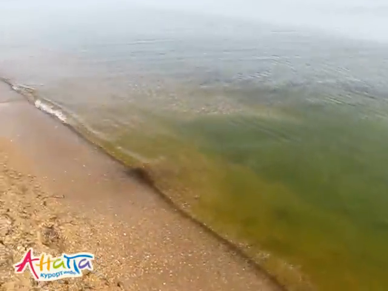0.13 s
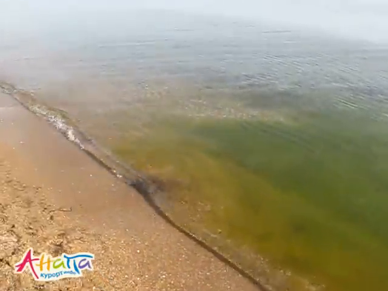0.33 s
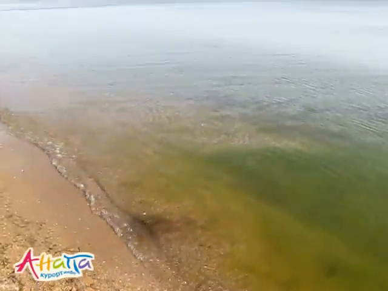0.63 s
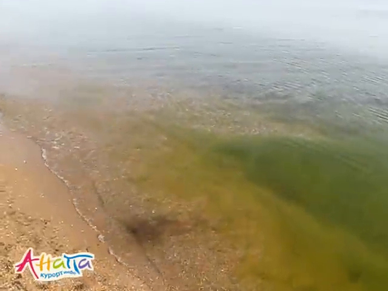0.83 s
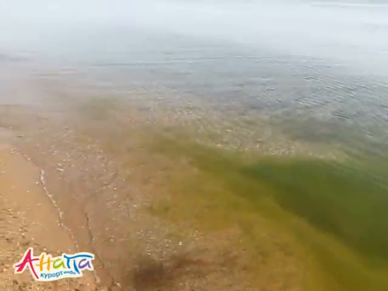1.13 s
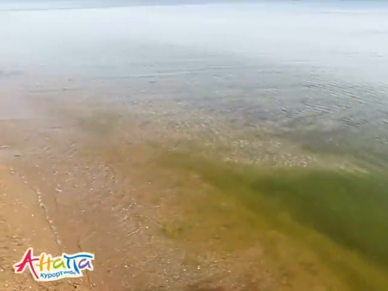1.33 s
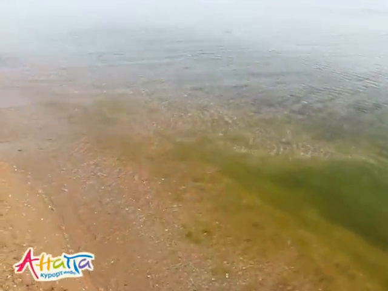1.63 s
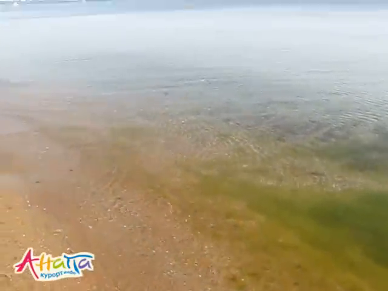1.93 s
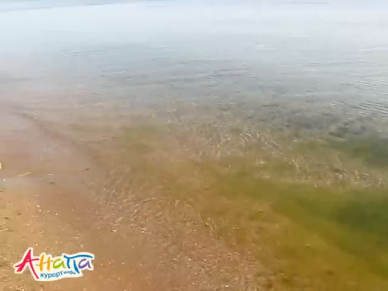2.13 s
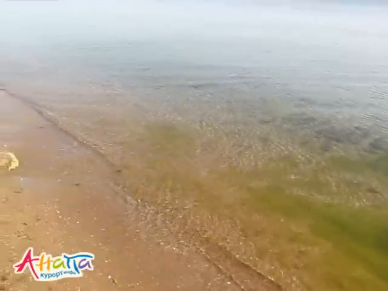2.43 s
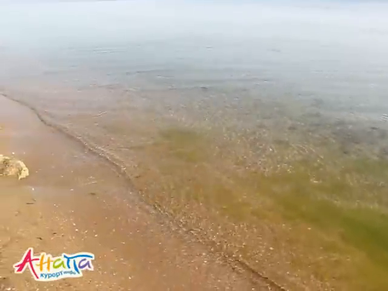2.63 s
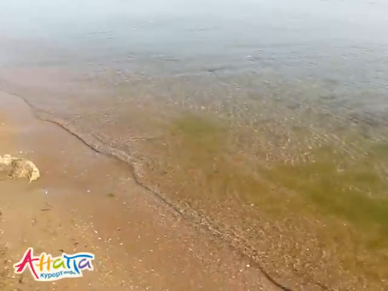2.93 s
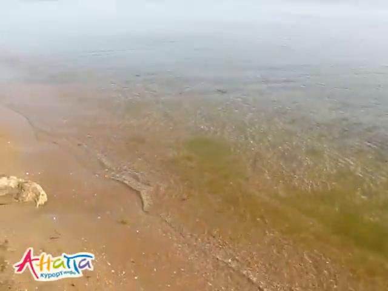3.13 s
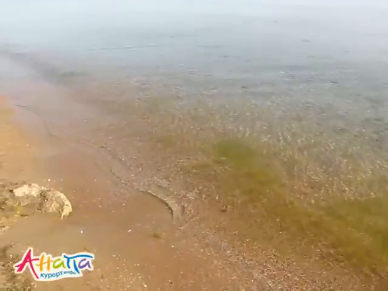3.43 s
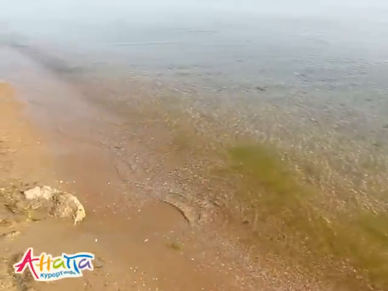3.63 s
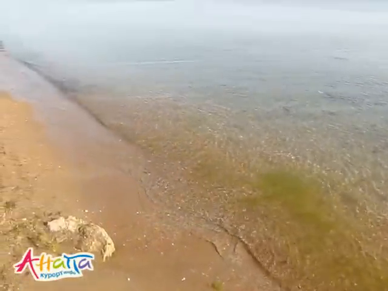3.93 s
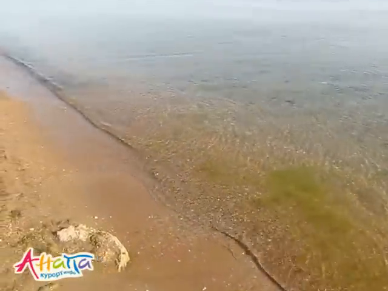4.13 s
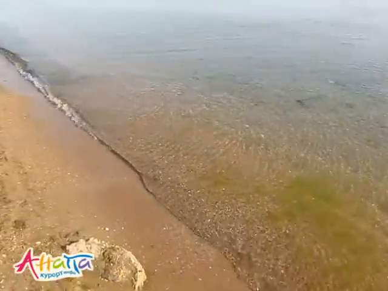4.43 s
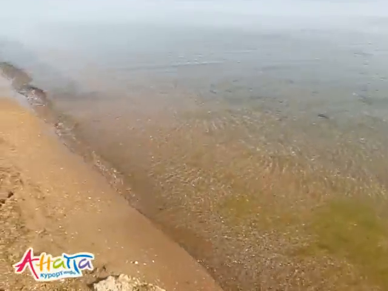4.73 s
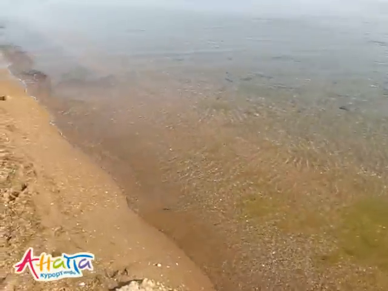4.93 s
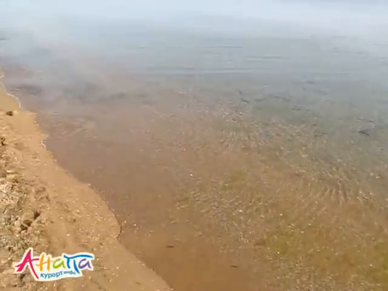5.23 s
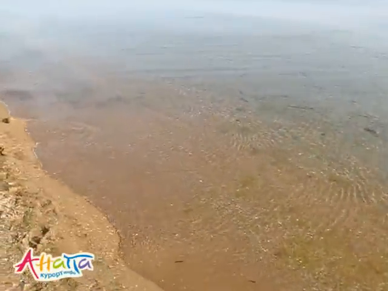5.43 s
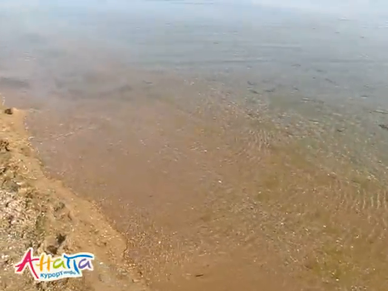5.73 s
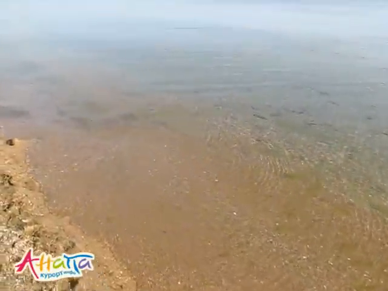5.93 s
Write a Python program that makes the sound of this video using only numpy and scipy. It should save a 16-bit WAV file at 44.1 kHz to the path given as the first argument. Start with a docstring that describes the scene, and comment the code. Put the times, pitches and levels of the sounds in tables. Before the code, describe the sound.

Close, bubbly wash of small waves on a sandy shore outdoors. A fizzing surge opens and fades within a second, and a puff of wind thumps the microphone. Scattered ticks and plips follow in a quieter spell, then a fuller gurgling wash and another bright splashy lap. The water drains to almost nothing and fluttering wind bumps dominate the end. The sound is dull on top and thin in the bass.

```python
"""Small waves on sand.

Small waves lap on a sandy shore close by: foam fizzes (grains of chirped tone and noise) and gurgles
(longer rising tones) as waves fold over. Single bubbles chirp, drops plip, spray ticks (decaying noise),
far surf hisses (coloured noise), and a light breeze buffets the microphone (lumps of low tone)."""
import sys
import numpy as np
from scipy import signal
from scipy.fft import rfft, irfft, next_fast_len
from scipy.io import wavfile
from scipy.ndimage import uniform_filter1d

SR = 44100
rng = np.random.default_rng(int(sys.argv[2]) if len(sys.argv) > 2 else 0)


def digitize_waveform(pressure):
    """Quantize a signal to 16-bit integers and store it at the path in sys.argv[1].

    Rows of a 2-D input are taken as channels; values are limited to [-1, 1].
    """
    field = np.atleast_2d(pressure).T
    bounded = np.clip(field, -1, 1)
    quanta = np.round(bounded * 32767).astype(np.int16)
    wavfile.write(sys.argv[1], SR, quanta)


N = 267642  # samples

# Levels are those ahead of record().
# swell of waves folding over, running up and draining: (time [s], fizz level [dB], gurgle level [dB])
SWELL_LEVELS = [(0.0, -32.5, -32), (0.07, -37, -44), (0.3, -32.5, -37.5), (0.62, -32.5, -41.5),
                (0.86, -38.5, -44.5), (0.9, -48.5, -47), (1.05, -54, -53.5), (1.23, -47.5, -49.5),
                (1.5, -48.5, -46), (1.66, -46.5, -46.5), (1.78, -51, -44.5), (1.88, -49.5, -44.5),
                (2.12, -45.5, -41.5), (2.6, -34.5, -34), (2.78, -42.5, -39.5), (3.05, -39, -36),
                (3.1, -38, -38), (3.3, -37.5, -37.5), (3.45, -43, -40), (3.8, -40.5, -38),
                (4.12, -41, -39.5), (4.3, -32.5, -33.5), (4.55, -32.5, -42.5), (4.74, -36.5, -43.5),
                (4.96, -40, -42), (5.01, -51, -60), (5.29, -50, -59), (5.5, -65, -65), (5.71, -49.5, -45.5),
                (5.93, -59.5, -56.5), (6.07, -47.5, -49)]
# small crests tumbling in a burst of foam: (time [s], fizz level [dB], gurgle level [dB], length [s])
CRESTS = [(0.221, -30, -34, 0.071), (0.633, -42.5, -27.5, 0.035), (0.707, -36, -36, 0.27),
          (1.261, -33.5, -37, 0.044), (1.281, -42, -42, 0.045), (1.613, -43, -42.5, 0.03),
          (1.921, -28.5, -46, 0.037), (1.932, -36, -31.5, 0.037), (1.955, -31, -47, 0.072),
          (1.98, -43, -35, 0.082), (2.014, -36, -33.5, 0.045), (2.031, -31.5, -48, 0.044),
          (2.26, -36, -51, 0.044), (2.641, -51, -33, 0.03), (2.883, -50, -37, 0.033),
          (3.337, -33.5, -36, 0.17), (3.937, -44, -50, 0.027), (4.19, -30, -47, 0.12),
          (4.394, -42, -27, 0.091), (4.503, -34, -28, 0.034), (4.578, -39.5, -26, 0.15),
          (4.682, -45, -28.5, 0.15), (1.646, -45, -38, 0.064), (5.27, -43, -52, 0.16),
          (5.986, -41, -60, 0.056)]
CREST_RISE_SHARE, CREST_DROP_DB = 0.46, 13  # share of length spent rising; fall at either end
# spectrum of the fine foam: (frequency [Hz], relative density [dB per Hz])
FIZZ_SPECTRUM = [(100, -52.5), (300, -21), (600, -0.5), (1200, -1), (2000, 0.5), (3000, -3), (4500, -10.5),
                 (10000, -14.5)]
# spectrum of the larger bubbles: (frequency [Hz], relative density [dB per Hz])
GURGLE_SPECTRUM = [(100, -41), (250, -31), (400, -7.5), (800, -3.5), (1300, -5), (2000, -12.5),
                   (4000, -29.5)]
# spectrum of the distant waves: (frequency [Hz], relative density [dB per Hz])
FAR_SURF_SPECTRUM = [(40, -7.5), (150, -7), (500, 2.5), (2000, 4.5), (3500, -2), (5000, -1.5),
                     (10000, -5.5)]
FAR_SURF_RMS_DB = -55
# breeze between its strongest eddies: (time [s], base level [dB])
BREEZE_LEVELS = [(0.0, -66), (0.15, -51), (0.34, -55.5), (0.56, -70.5), (0.75, -53.5), (0.97, -41.5),
                 (1.01, -52.5), (1.11, -61.5), (1.4, -56), (2.0, -55), (2.45, -58), (2.9, -61.5),
                 (3.2, -65), (3.33, -58.5), (4.2, -59.5), (4.5, -72.5), (4.88, -57), (4.96, -55),
                 (5.03, -45), (5.12, -46), (5.16, -38), (5.2, -45), (5.24, -40), (5.3, -41.5), (5.35, -38),
                 (5.395, -54), (5.43, -31), (5.455, -45.5), (5.52, -44.5), (5.56, -44), (5.585, -62),
                 (5.68, -55), (5.76, -43.5), (5.79, -41.5), (5.83, -36), (5.85, -43), (5.89, -40.5),
                 (5.95, -40), (6.0, -42.5), (6.035, -40), (6.07, -30)]
# strongest eddies on the microphone: (time [s], peak level [dB], starting frequency [Hz])
PUFFS = [(0.783, -25.5, 446), (0.846, -30, 325), (0.962, -40, 453), (1.237, -31.5, 295), (1.445, -41, 380),
         (0.874, -33, 500), (0.882, -19, 740), (0.891, -23, 555), (0.904, -25, 412), (0.981, -28, 500),
         (1.156, -27.5, 453), (1.223, -27.5, 350), (1.351, -35.5, 476), (1.43, -34, 390),
         (1.645, -29.5, 520), (1.687, -26, 392), (1.885, -37, 324), (1.77, -44, 255), (4.621, -28.5, 398),
         (4.884, -27.5, 440), (4.984, -20, 473), (4.999, -21, 704), (5.008, -15, 650), (5.063, -25, 640),
         (5.072, -24.5, 640), (5.088, -15, 790), (5.109, -22, 740), (5.145, -25, 390), (5.164, -31, 550),
         (5.243, -28.5, 474), (5.27, -33, 587), (5.362, -20, 797), (5.379, -16, 850), (5.413, -26, 590),
         (5.421, -27, 560), (5.441, -27.5, 413), (5.47, -23, 515), (5.486, -24, 500), (5.494, -20.5, 660),
         (5.493, -25.5, 1570), (5.167, -30, 596), (5.775, -39, 330), (5.785, -34, 448), (5.974, -40, 400),
         (0.943, -40, 450), (0.988, -28, 600), (1.043, -39, 600), (1.404, -37, 400), (1.488, -33, 550),
         (5.356, -27, 900), (5.376, -25, 665), (5.437, -33, 600), (5.504, -30, 600), (5.542, -33, 383),
         (5.561, -30, 800), (5.636, -35, 704), (5.047, -31, 452), (5.057, -29, 600), (5.556, -27.5, 585),
         (5.568, -22, 436), (5.64, -23, 617), (5.742, -27.5, 790), (5.83, -26, 477), (5.868, -31, 327),
         (5.883, -32.5, 480), (5.895, -34, 340), (5.947, -27.5, 480), (5.519, -34, 404), (5.094, -21, 530),
         (5.428, -28, 405), (5.919, -18, 474), (5.94, -25.5, 485), (6.014, -26, 408), (6.053, -23, 553),
         (6.064, -17.5, 720)]
EDDY_CYCLES = 1.309  # before the stretch in breeze()
# rough air gathers around each eddy
GUST_UNDER_DB, GUST_RISE_DB_PER_S, GUST_FALL_DB_PER_S = 14, 1502, 1302
# spectrum of the soft lumps of air: (frequency [Hz], relative density [dB per Hz])
LUMP_SPECTRUM = [(30, -54), (100, -23), (180, -6), (280, 0), (500, 0), (900, -20), (1500, -31.5),
                 (3000, -59)]
# spectrum of the strong gusts: (frequency [Hz], relative density [dB per Hz])
SNAP_SPECTRUM = [(100, -44.5), (300, -13), (600, -10.5), (1000, -11), (1500, -24.5), (2500, -35.5),
                 (4000, -43.5)]
# spray ticking on wet sand: (time [s], nominal level [dB])
TICKS = [(0.1338, -29), (0.172, -35), (0.531, -28.5), (1.253, -26.5), (1.258, -31.5), (1.265, -32),
         (1.4104, -37), (1.8235, -38), (4.924, -32), (5.316, -43), (5.331, -45), (1.075, -55), (1.683, -45),
         (1.703, -43), (1.861, -40), (3.45, -43), (1.911, -27.5), (2.0825, -32), (2.1217, -37),
         (2.261, -30.5), (3.6754, -34), (3.941, -27), (4.1367, -28.5), (0.05, -40), (0.2143, -34),
         (0.23, -33), (0.2813, -35), (0.3594, -33), (0.431, -32), (0.499, -30), (0.5763, -30),
         (0.7006, -29), (1.971, -30), (2.094, -42), (2.1587, -37), (2.606, -31), (2.862, -40), (4.259, -26),
         (4.4113, -30), (4.198, -27), (4.247, -24), (4.578, -31), (0.185, -36.5), (0.462, -33),
         (0.595, -31.5), (0.73, -35), (6.045, -38.5)]
TICK_HZ, TICK_T60_S = 2550, 0.02
# single bubbles near the surface:
# (time [s], peak level [dB], first frequency [Hz], last frequency [Hz], length before stretch [ms])
BUBBLES = [(.105, -32, 2880, 3000, 22), (.17, -28.5, 2550, 2650, 9), (.183, -32.5, 500, 586, 15),
           (.208, -35, 1770, 1860, 5.5), (.208, -28.5, 945, 900, 16), (.226, -34, 570, 663, 20),
           (.282, -29, 2470, 2550, 7.5), (.325, -28, 1430, 1500, 11), (.346, -31, 2880, 2930, 12),
           (3.078, -36, 2020, 2140, 18), (4.313, -30.5, 2550, 2730, 11), (4.388, -30, 925, 1050, 9.2),
           (4.482, -27, 1450, 1540, 7.4), (4.492, -24.5, 1830, 1880, 5), (4.51, -23, 1360, 1450, 11),
           (4.556, -25, 2290, 2360, 4.8), (4.573, -22, 2240, 2360, 6.5), (4.578, -31, 974, 785, 7.8),
           (.215, -33, 570, 725, 14), (.625, -26.5, 1130, 1320, 19), (2.245, -37.5, 743, 723, 69),
           (2.312, -31, 900, 1100, 19), (2.69, -31.5, 635, 820, 14), (2.866, -29.5, 2320, 2430, 10.6),
           (3.75, -30.5, 590, 690, 15), (3.797, -31, 666, 900, 26), (4.248, -29, 620, 1400, 27),
           (4.303, -25, 450, 1190, 45), (4.37, -29, 540, 950, 24), (4.376, -23, 1950, 2000, 8),
           (4.384, -23, 1850, 1900, 8), (4.411, -19, 800, 880, 11), (4.423, -24, 520, 1200, 39),
           (4.585, -32, 588, 478, 54), (4.677, -25, 598, 650, 12.7), (4.747, -24.5, 920, 1050, 11),
           (4.305, -23, 800, 860, 8.1), (4.366, -22, 980, 1240, 7.6), (4.383, -26, 1270, 900, 12.6),
           (4.4, -29, 1280, 1380, 5.7), (4.498, -28.5, 820, 900, 21), (4.534, -28, 850, 950, 9),
           (4.55, -31, 950, 1100, 17), (4.608, -32, 1340, 1270, 26), (4.688, -30, 734, 970, 35),
           (4.757, -33, 1100, 1610, 14), (.085, -35, 955, 1020, 23), (.488, -30, 924, 955, 20),
           (3.17, -34, 450, 527, 22), (3.23, -32, 710, 960, 15), (3.445, -35, 2800, 2900, 10),
           (1.715, -43, 477, 422, 22), (1.855, -40.5, 500, 556, 11)]
# drops and small slaps: (time [s], peak level [dB], last frequency [Hz], length before stretch [ms])
PLIPS = [(0.132, -21, 1710, 1.2), (0.535, -23, 2140, 2.2), (0.599, -19.5, 1020, 3),
         (0.623, -18.5, 2100, 1.9), (0.634, -23, 1070, 0.55), (1.253, -22, 2430, 1.54),
         (1.266, -19, 1110, 3), (1.412, -25.5, 1190, 1.26), (1.55, -27, 1490, 0.65),
         (1.608, -30.5, 1900, 2.5), (0.212, -19, 1840, 1.9), (1.703, -20.5, 1700, 0.86),
         (1.732, -30, 1260, 1.55), (1.915, -23.5, 1230, 1.85), (1.927, -15.5, 1640, 0.72),
         (1.933, -19, 2580, 0.96), (1.956, -20, 2480, 1.9), (2.036, -26, 1700, 1.5),
         (1.954, -18, 1390, 2.2), (1.967, -21, 1450, 3.5), (1.996, -18.5, 1280, 1.6),
         (2.026, -19.5, 1130, 2.9), (2.075, -23.5, 1170, 0.6), (2.26, -28, 2390, 1.36),
         (2.315, -28, 1580, 0.89), (2.447, -26, 1130, 1.34), (2.521, -18, 1120, 1.2),
         (2.559, -20, 1120, 2.03), (2.607, -13.5, 1200, 1.6), (2.641, -22, 1210, 1.6),
         (2.662, -18.5, 1050, 1.64), (2.813, -19.5, 780, 2.15), (2.848, -23, 910, 2.26),
         (2.978, -21, 1010, 1.55), (3.024, -18.5, 900, 2.5), (3.327, -13.5, 1200, 0.63),
         (4.099, -24.5, 1500, 1.8), (4.205, -12.5, 1540, 3.4), (4.594, -13.5, 1630, 1.7)]
# steep treble loss above 4 kHz, a dip near 5.5 kHz, faint treble above it: (frequency [Hz], gain [dB])
TREBLE_RESPONSE = [(3000, -1.5), (4000, -1.5), (4600, -10.5), (5100, -22.5), (5550, -29.5), (6100, -27.5),
                   (6800, -25), (7500, -33), (9000, -48.5)]
BAND_LIMIT_HZ = 9259


def gain_of(db):
    """Decibels to a factor."""
    return 10 ** (np.asarray(db) / 20)


def evened(x):
    """Scales to rms 1."""
    return x / np.sqrt(np.mean(x ** 2) + 1e-20)


def curve(rows, axis):
    """One table column, interpolated to dB at every sample."""
    rows = np.array(rows)
    return np.interp(np.arange(N) / SR, rows[:, 0], rows[:, axis])


def shape(points, hz):
    """Reads a spectrum table as factors, linear in dB over log frequency."""
    table_hz, table_db = np.transpose(points)
    return gain_of(np.interp(np.log(hz + 1), np.log(table_hz), table_db))


def coloured(x, points):
    """Flattens the smoothed spectrum of x, then gives it that of a table; rms 1."""
    size = next_fast_len(N)
    z, hz = rfft(x, size), np.fft.rfftfreq(size, 1 / SR)
    own = np.sqrt(uniform_filter1d(abs(z) ** 2, size=1500))
    flat = z / np.maximum(own, own.max() * 1e-3)
    return evened(irfft(flat * shape(points, hz), size)[:N])


def above(x, hz, order):
    """High-pass."""
    return signal.sosfilt(signal.butter(order, hz, "high", fs=SR, output="sos"), x)


def wander(cutoff_hz):
    """Low-passed noise of rms 1."""
    x = rng.standard_normal(N + 2 * SR)  # a spare second at either end
    low = signal.butter(1, cutoff_hz, fs=SR, output="sos")
    return evened(signal.sosfiltfilt(low, x)[SR:-SR])


def chirp(first_hz, last_hz, seconds, turn, skew=1., soft=1.36):
    """Gliding tone under a hump; skew under 1 puts the hump early, small soft flattens it."""
    length = max(int(seconds * SR), 4)
    u = np.arange(length) / length
    cycles = seconds * (first_hz * u + (last_hz - first_hz) * u ** 2 / 2)
    hump = np.sin(np.pi * u ** skew) ** soft
    return hump * np.cos(2 * np.pi * (cycles + turn))


def grains(low_hz, high_hz, cycles, glide, per_s, spread_db, count=24):
    """Gliding tones of many pitches struck at random; spread_db varies their strength; rms 1."""
    strength = gain_of(spread_db * np.minimum(rng.exponential(1, N), 5))
    strikes = strength * (rng.random(N) < per_s / SR)
    kind, turn, out = rng.integers(0, count, N), rng.random(count), np.zeros(N)
    for k, hz in enumerate(np.geomspace(low_hz, high_hz, count)):
        grain = chirp(hz, hz * glide, cycles / hz, turn[k], skew=0.72)
        out += signal.oaconvolve(strikes * (kind == k), grain)[:N]
    return evened(out)


def played(rows, stretch, lead, skew, soft):
    """Lays tones (s, dB, first Hz, last Hz, ms) on a track; lead is the share before the time."""
    out, turns = np.zeros(N + SR), rng.random(len(rows))
    for (s, db, first_hz, last_hz, ms), turn in zip(rows, turns):
        tone = gain_of(db) * chirp(first_hz, last_hz, stretch * ms / 1000, turn, skew, soft)
        at = int(s * SR - lead * len(tone))
        out[at:at + len(tone)] += tone
    return out[:N]


def raised(level_db, peaks):
    """Adds the power of peaks (s, dB, rise dB/s, fall dB/s) to a level in dB."""
    t, power = np.arange(N) / SR, gain_of(level_db) ** 2
    for s, db, rise, fall in peaks:
        drop_db = np.maximum(rise * (s - t), fall * (t - s))
        power = power + gain_of(db - drop_db) ** 2
    return 10 * np.log10(power)


def swell(axis):
    """Slow swell with the tumbling crests on top, in dB."""
    crests = []
    for crest in CRESTS:
        rise_s, fall_s = CREST_RISE_SHARE * crest[3], (1 - CREST_RISE_SHARE) * crest[3]
        crests.append((crest[0], crest[axis], CREST_DROP_DB / rise_s, CREST_DROP_DB / fall_s))
    return raised(curve(SWELL_LEVELS, axis=axis), crests)


def patchy(x, spread_db):
    """Separate small splashes: level drifts in patches some 400 Hz wide and 30 ms long."""
    z = signal.stft(x, nperseg=512, noverlap=384)[2]
    patches = uniform_filter1d(rng.standard_normal(z.shape), size=5, axis=0)
    patches = evened(uniform_filter1d(patches, size=10, axis=1))
    return evened(signal.istft(z * gain_of(spread_db * patches), nperseg=512, noverlap=384)[1][:N])


def fizz():
    """Fine foam: thousands of tiny bubbles burst over the smooth hiss of farther water."""
    bursts = grains(low_hz=500, high_hz=8750, cycles=4.18, glide=1.223, per_s=5000, spread_db=0.0)
    crackle = grains(low_hz=2040, high_hz=7120, cycles=0.55, glide=1.0, per_s=400, spread_db=-0.3)
    pings = grains(low_hz=900, high_hz=4533, cycles=13.0, glide=1.11, per_s=350, spread_db=2.0)
    hiss = rng.standard_normal(N)
    mix = bursts + 0.4 * pings + 0.54 * crackle + 0.45 * hiss
    foam = coloured(patchy(mix, spread_db=1.6), FIZZ_SPECTRUM)
    level_db = swell(axis=1) + 0.33 * wander(cutoff_hz=110) + 1.6 * wander(cutoff_hz=3.7)
    return foam * gain_of(level_db)


def gurgle():
    """Larger bubbles ring longer and rise in pitch as they near the surface.

    A breaking wave makes more middling bubbles than large ones: the deep part follows loud levels in part."""
    ringing = grains(low_hz=350, high_hz=1514, cycles=10.5, glide=1.408, per_s=760, spread_db=2.0)
    slaps = grains(low_hz=390, high_hz=1500, cycles=2.05, glide=1.37, per_s=1300, spread_db=1.5)
    bubbles = coloured(ringing + 1.13 * slaps, GURGLE_SPECTRUM)
    level_db = swell(axis=2) + 0.7 * wander(cutoff_hz=18)
    deep = signal.oaconvolve(bubbles, signal.firwin(401, 560, fs=SR), "same")
    deep_db = level_db - 0.36 * np.maximum(level_db + 37.0, 0)
    return (bubbles - deep) * gain_of(level_db) + deep * gain_of(deep_db)


def far_surf():
    """Steady hiss of waves farther down the shore, heard in the lulls."""
    return gain_of(FAR_SURF_RMS_DB) * coloured(rng.standard_normal(N), FAR_SURF_SPECTRUM)


def breeze():
    """Eddies of air push the membrane in lumps a cycle or two long; strong gusts turn sharper."""
    gusts = [(s, db - GUST_UNDER_DB, GUST_RISE_DB_PER_S, GUST_FALL_DB_PER_S) for s, db, hz in PUFFS]
    base_db = curve(BREEZE_LEVELS, axis=1) + 1.5 * wander(cutoff_hz=4.0)
    gust_db = raised(base_db, gusts) + 3.1 * wander(cutoff_hz=31)
    lumps = grains(low_hz=102.5, high_hz=1100, cycles=2.23, glide=0.87, per_s=450, spread_db=1.5)
    snaps = grains(low_hz=278.0, high_hz=2580, cycles=1.84, glide=0.81, per_s=1100, spread_db=0.0)
    soft_db = gust_db + 1.0 - 0.58 * np.maximum(gust_db + 40.0, 0)
    sharp_db = gust_db + 0.88 * np.minimum(gust_db + 31.5, -3)
    steady = coloured(lumps, LUMP_SPECTRUM) * gain_of(soft_db)
    steady = steady + coloured(snaps, SNAP_SPECTRUM) * gain_of(sharp_db)
    eddies = [(s, db, hz, hz * 0.97, 1000 * EDDY_CYCLES / hz) for s, db, hz in PUFFS]
    # short, higher, falling tone at the middle of each eddy, stronger in hard pushes
    cores = [(s, db - 10.5 + 0.73 * (db + 20.5), hz * 1.81, hz * 1.17, 1.5) for s, db, hz in PUFFS]
    return steady + played(eddies + cores, stretch=2.044, lead=0.514, skew=1.17, soft=1.85)


def spray():
    """Each tick is a wide snap of noise with a brief ring in it; too small for bass."""
    out, t = np.zeros(N + SR), np.arange(1000) / SR
    noise = rng.standard_normal((len(TICKS), 1000))
    ring = np.sin(2 * np.pi * TICK_HZ * t)
    for (s, db), snap in zip(TICKS, noise):
        decay = gain_of(db - 60 * t / TICK_T60_S)
        tick = decay * (1.93 * uniform_filter1d(snap, size=3) + 0.52 * ring)
        out[int(s * SR):][:len(t)] += tick
    return above(out[:N], hz=900, order=2)


def splashes():
    """Bubbles and drops that stand out of the wash; small things radiate no bass."""
    bubbles = played(BUBBLES, stretch=0.91, lead=0, skew=0.54, soft=0.47)
    drop_rows = [(s, db, hz * 0.86, hz, ms) for s, db, hz, ms in PLIPS]
    drops = played(drop_rows, stretch=1.656, lead=0.437, skew=0.77, soft=3.8)
    return above(bubbles + drops, hz=302, order=2)


def scene():
    """Water and wind at one microphone."""
    water = fizz() + gurgle() + far_surf()
    return (water + breeze() + spray() + splashes())[None]


def record(dry):
    """Bass cut, treble loss, then band limit."""
    cut = above(dry, hz=180, order=2)
    hz = np.linspace(0, SR / 2, num=257)
    treble = signal.firwin2(255, hz, shape(TREBLE_RESPONSE, hz), fs=SR, window="blackman")
    heard = signal.oaconvolve(cut, treble[None], "same")
    band = signal.firwin(255, BAND_LIMIT_HZ, window=("kaiser", 9), fs=SR)
    return signal.oaconvolve(heard, band[None], "same")


dry = scene()
out = record(dry)
digitize_waveform(out)
```